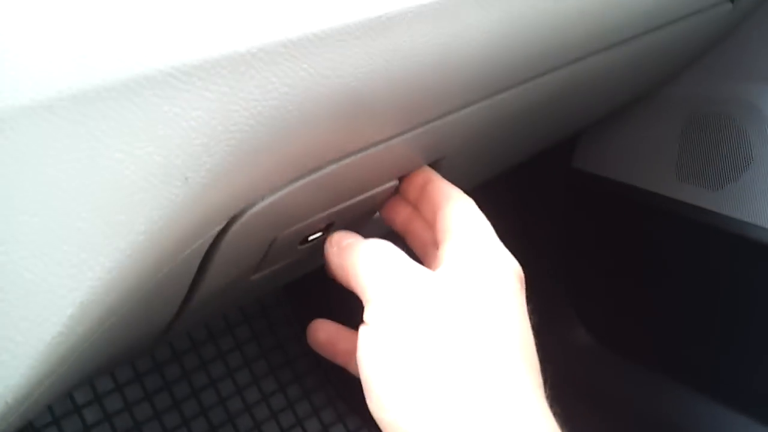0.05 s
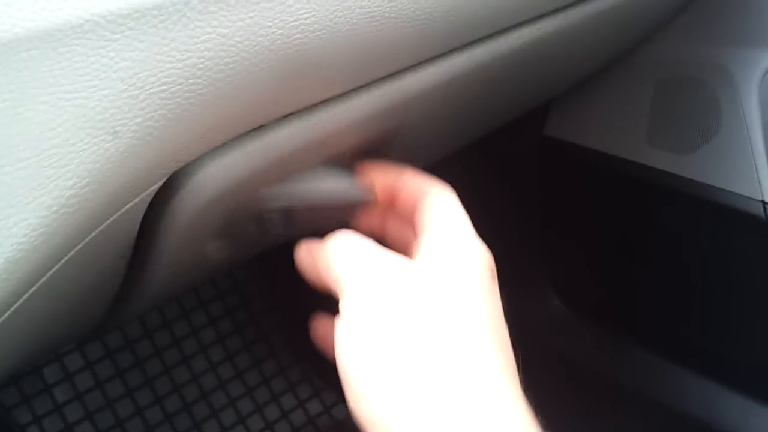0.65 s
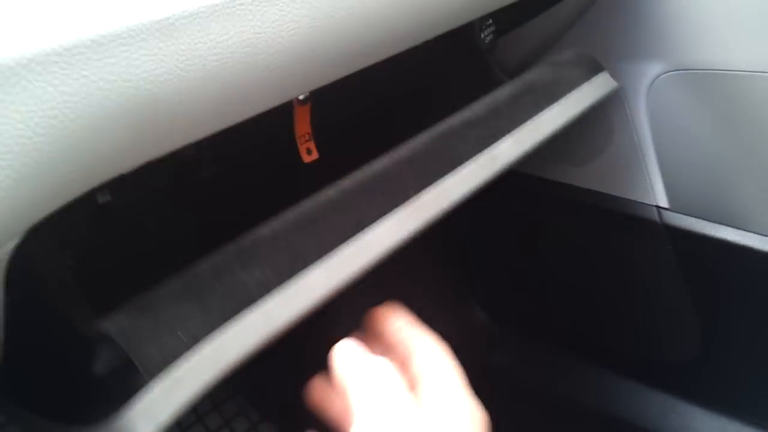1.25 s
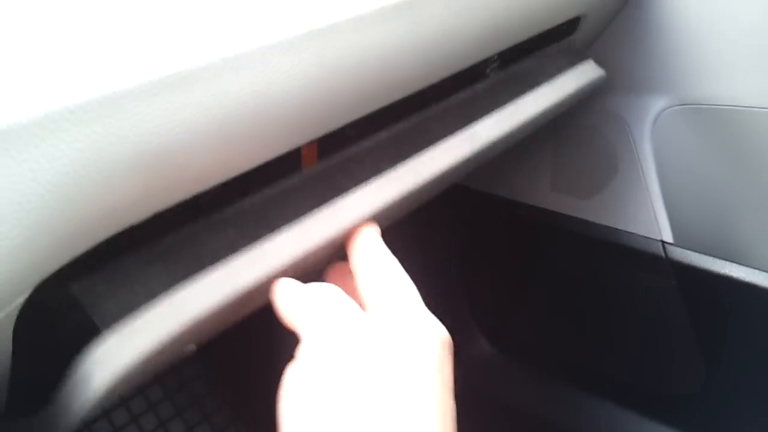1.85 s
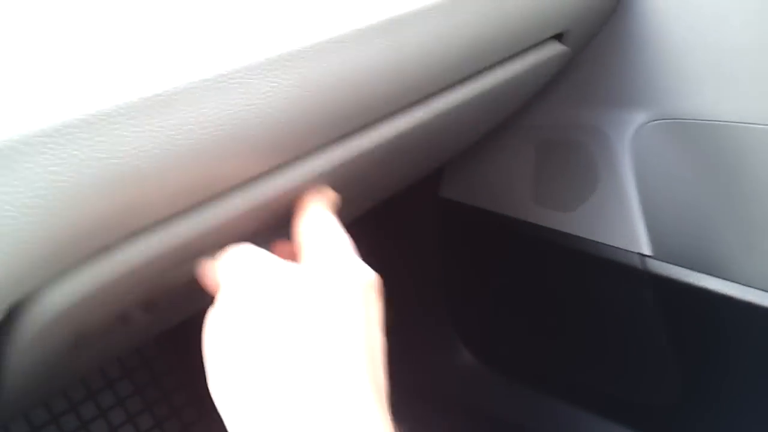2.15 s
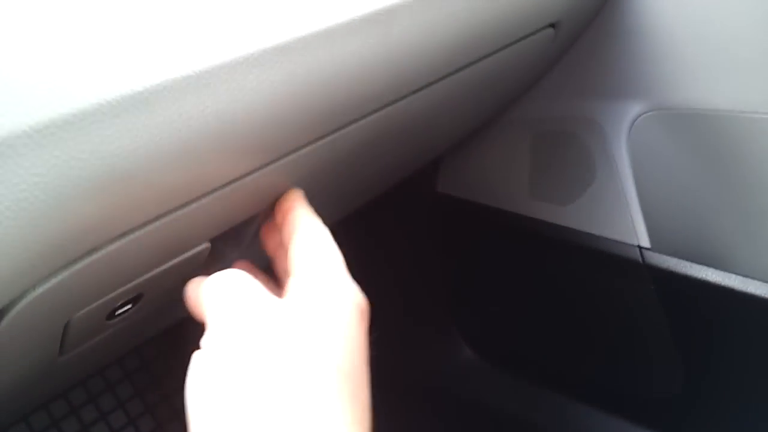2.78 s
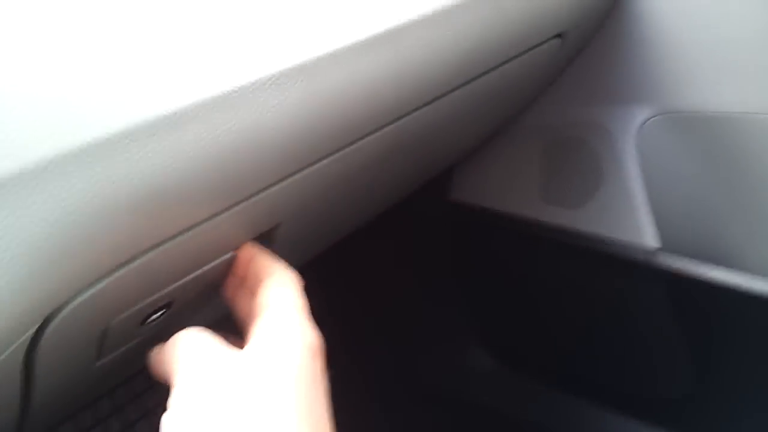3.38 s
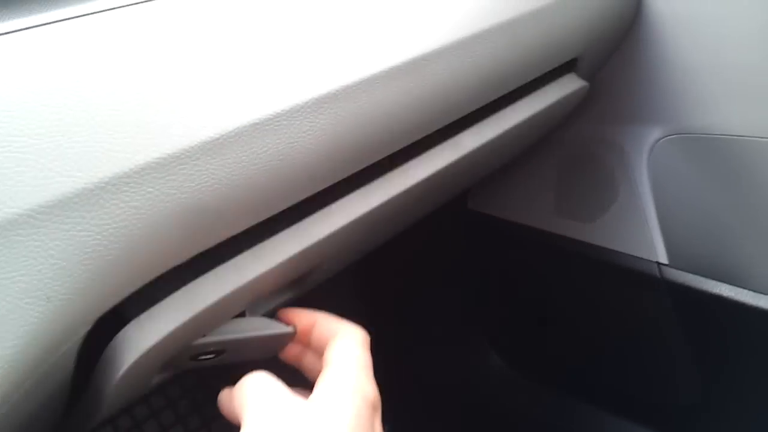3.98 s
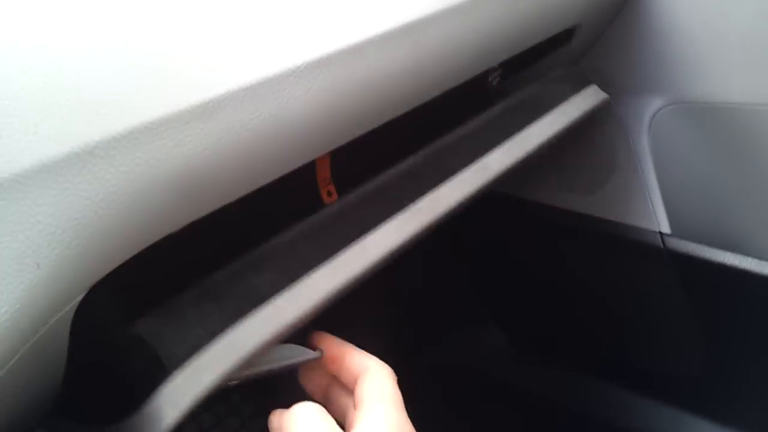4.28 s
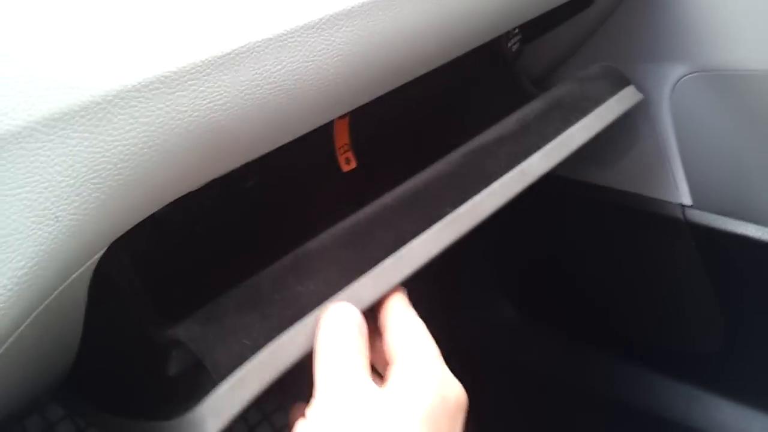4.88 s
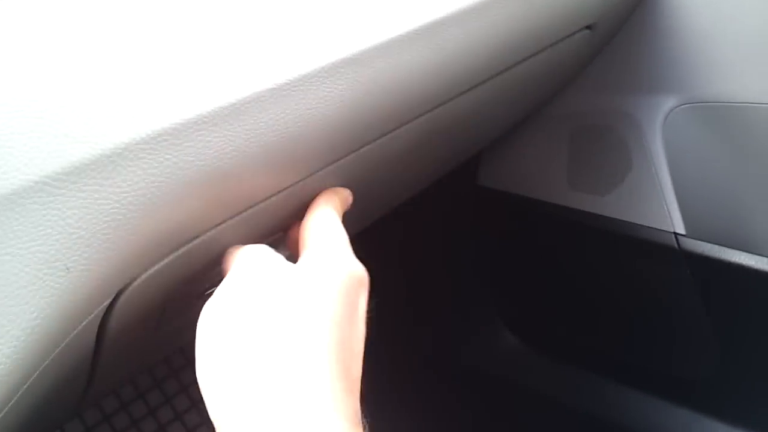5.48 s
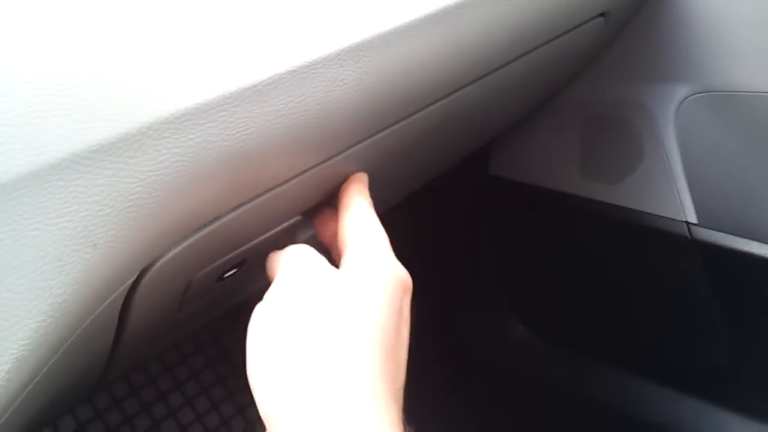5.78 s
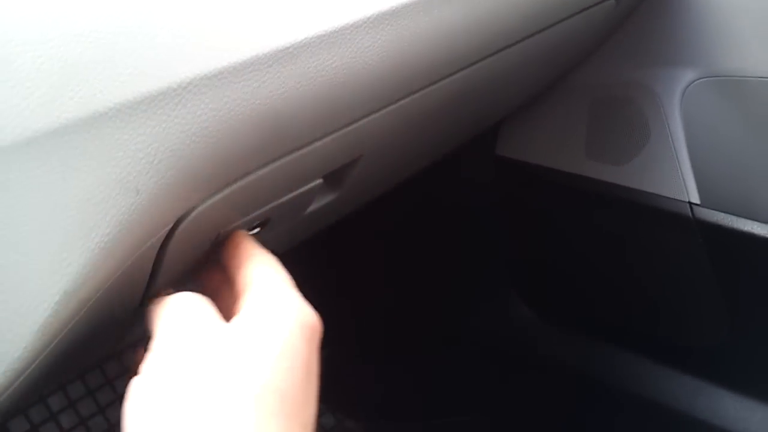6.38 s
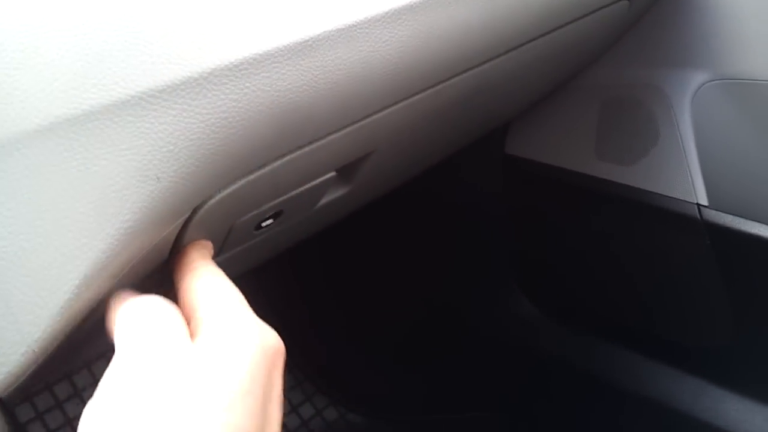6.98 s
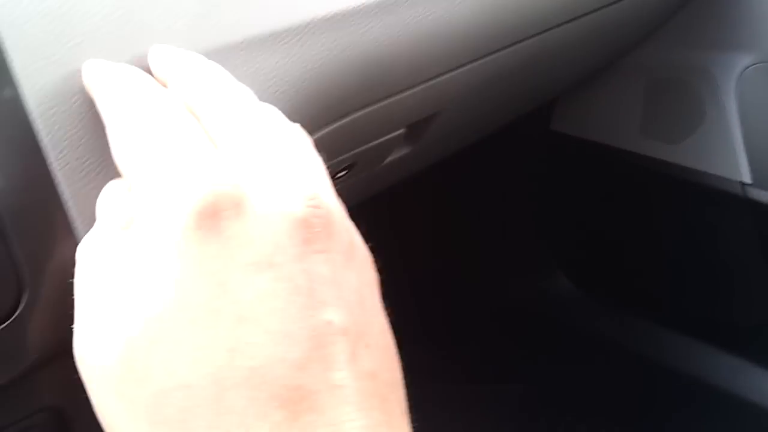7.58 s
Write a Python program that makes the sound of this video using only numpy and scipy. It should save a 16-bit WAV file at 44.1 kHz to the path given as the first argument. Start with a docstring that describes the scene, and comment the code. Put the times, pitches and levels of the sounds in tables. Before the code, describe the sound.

A plastic glove box is unlatched, drops open with a sharp crack and is pushed shut, twice, in a quiet parked car.

```python
"""A faint squeak over low hum and hiss, then taps and latch clunks: a glove box in a quiet parked car.
Twice the hollow plastic lid is unlatched, drops with a crack against its stop and is pushed shut.
Each blow rings the part it lands on, hinge and catch tick, and at the end a hand brushes the dashboard.
Two microphones in the cabin, the left a little farther off; the hardest cracks overload the recorder."""
import sys
import numpy as np
from scipy import signal
from scipy.fft import rfft, irfft, next_fast_len
from scipy.io import wavfile

SR = 44100
rng = np.random.default_rng(int(sys.argv[2]) if len(sys.argv) > 2 else 0)


def put_to_file(sound):
    """Save the sound as 16-bit audio at rate SR, in the file named by the first command-line argument."""
    columns = np.atleast_2d(sound).T  # one column per channel
    safe = np.clip(columns, -1, 1)
    whole_steps = np.round(safe * 32767)
    wavfile.write(sys.argv[1], SR, whole_steps.astype(np.int16))


N = 337365

# the stop's crowded, well-damped modes: f/Hz, level/dB per Hz
STOP_BODY = [(30, -49), (130, -20), (190, -33), (290, -29), (370, -10.5), (800, -5.5), (1080, -5.5),
             (1500, 0.5), (2000, 3), (2550, 0), (3100, -6), (4300, -10.5), (5500, -5.5), (6300, -12),
             (7400, -1), (9500, -13.5), (12000, -30), (14500, -24.5)]
# its clear modes: f/Hz, level/dB, t60/s
STOP_MODES = [(374.3, -15, .2), (428.4, -15.5, 0.22), (649, -17, 0.3), (710, -13.5, 0.11), (870, -10, 0.18),
              (1174, -23, .09), (1580, -7, 0.14), (1780, -4, 0.14), (1855, 0, .07), (1970, -6.5, 0.06),
              (2192, 4, 0.042), (2220, 1, 0.041), (2575.4, -0.5, 0.068), (2725, -15, 0.06),
              (4800, -9, 0.05), (5850, -8, 0.0504), (7100, -8.5, 0.046), (7815, -14, 0.055)]
# the lid falls open: t/s, level/dB, bass/dB, treble/dB, stay knock/dB, second crack/dB, bounce delay/s
DROPS = [(0.9333, -7, -7, -1, -29.5, -20, .0624), (4.3452, -5.5, 4, 2.5, -23, -10, .083)]

def lid_drops(stop_modes_db=-5.5):
    """The stay knocks and ticks, then the lid cracks twice against its stop and bounces once."""
    out = np.zeros((2, N))
    stop = STOP_BODY, STOP_MODES, stop_modes_db
    for s, db, bass_db, treble_db, stay_db, second_db, bounce_s in DROPS:
        add(out, s - .0413, knock(stay_db, weight_db=-12, hardness_db=10.5, build_s=.0015, ring=1.13))
        add(out, s - .02, tick(-32, treble_db=-13, ring=1.7))
        add(out, s, blow(*stop, db, bass_db, treble_db, build_s=.001, ring=.989, size=16384))
        second = blow(*stop, second_db, bass_db=1, treble_db=-7.5, build_s=.0012, ring=.678, size=8192)
        add(out, s + .0147, second)
        bounce = knock(db - 28.5, weight_db=-4, hardness_db=-3, build_s=.0022, ring=.5, size=3072)
        add(out, s + bounce_s, bounce)
    return out

# the hollow lid's crowded modes: f/Hz, level/dB per Hz
LID_BODY = [(25, -35), (70, -23), (190, -16.5), (290, -9), (400, -3), (620, -2.5), (780, -3), (1500, -1),
            (2300, -4), (3000, -8), (4100, -8.5), (5600, -16), (7700, -11.5), (10000, -21.5),
            (12500, -31.5), (14500, -32)]
# its clear modes: f/Hz, level/dB, t60/s
LID_MODES = [(392.8, -4.5, 0.18), (421, -1.5, 0.15), (499.3, 0.5, 0.14), (606.1, -3.5, 0.098),
             (651, -7, 0.14), (919.6, 1, 0.12), (1050, -2.5, 0.096), (1326, -3, .07), (1509.4, 3, 0.098),
             (1850, -1, 0.052)]
LID = LID_BODY, LID_MODES, -6  # clear modes against the clack/dB
# the lid is pushed home: t/s, level/dB, bass/dB, treble/dB, ring factor, drag/dB, settling knock/dB
SHUTS = [(2.2, -16, -2, -1, 0.68, -24.5, -35), (5.425, -12.5, -8.5, -2, 1.105, -22.5, -42.5)]

def lid_shuts():
    """The lid drags over the latch, slams into its frame and settles back."""
    out = np.zeros((2, N))
    for s, db, bass_db, treble_db, ring, drag_db, settle_db in SHUTS:
        drag = knock(drag_db, weight_db=bass_db + 5, hardness_db=2, build_s=.0033, ring=1.68)
        add(out, s - .011, drag)
        add(out, s, blow(*LID, db, bass_db, treble_db, build_s=.0022, ring=ring, size=12288))
        settle = knock(settle_db, weight_db=8, hardness_db=-5, build_s=.0011, ring=1.7, size=6144)
        add(out, s + .1305, settle)
    return out

# latch clunks: t/s, level/dB, weight/dB, hardness/dB, load/dB re level, rattle/dB re level, ring factor
CLUNKS = [(.454, -25, 0.5, 7, -4.5, -12, 1.01), (.502, -21.5, 0, -7.5, -0.5, -13, 0.74),
          (.627, -19, -3.5, 6.5, 1.5, -13, 1.16), (.659, -16.5, 0.5, -4, -6, -4.5, 0.8),
          (1.959, -19, -1.5, 6, 2.5, -13, 1.2), (2.168, -23, 4, 10, -6, -7, 1.2),
          (3.702, -26, 6, 3.5, -13, -19, 0.8), (3.908, -16, -13.5, 0, -6.5, -8, 1.26),
          (3.9287, -14.5, 0.5, 6.5, -9, -7, 0.86), (5.331, -19.5, -6, 7, 2, -13, 1.325),
          (5.406, -21, -11, 1, 2.5, -10, 1.3)]

def latch(load_after_s=.007, rattle_gap_s=.0205, rattle_fall_db=11.5):
    """The bolts strike, the lid takes the load with a second knock, then rattles loosely."""
    out = np.zeros((2, N))
    for s, db, weight_db, hardness_db, load_db, rattle_db, ring in CLUNKS:
        add(out, s, knock(db, weight_db, hardness_db, build_s=.0032, ring=ring, size=12288))
        add(out, s + load_after_s, knock(db + load_db, weight_db, hardness_db, build_s=.0013, ring=ring))
        for k in range(2):
            dying_db = db + rattle_db - k * rattle_fall_db
            rattle = knock(dying_db, weight_db=1.5, hardness_db=.5, build_s=.00265, ring=.64, size=4096)
            add(out, s + (k + 1) * rattle_gap_s, rattle)
    return out

# small ticks: t/s, level/dB, treble/dB, ring factor
TICKS = [(.44, -45, -8.5, 1.0), (.69, -18.5, 13, .7), (2.001, -33.5, -14.5, 1.0), (2.024, -33.5, -16, 2.14),
         (2.235, -30, 0, 1.35), (3.962, -27, -5.5, 0.51), (4.175, -30, 3, .95), (4.192, -35.5, -1, 0.93),
         (4.2548, -30, 4.5, 0.83), (4.2754, -36, -5.5, 1.0), (5.385, -26.5, -12, 1.7),
         (5.663, -30.5, 0, 0.88)]

def hinge_and_catch():
    """Hinge and catch tick between the heavier blows."""
    out = np.zeros((2, N))
    for s, db, treble_db, ring in TICKS:
        add(out, s, tick(db, treble_db, ring))
    return out

# the catch's crowded modes: f/Hz, level/dB per Hz
CATCH_BODY = [(60, -22), (180, -7.5), (320, -2.5), (650, 0.5), (1100, -0.5), (1500, -3), (2600, 0),
              (4000, -3.5), (5500, -1.5), (7700, -1.5), (10000, -3), (13000, -15), (14500, -16)]
# its clear modes: f/Hz, level/dB, t60/s
CATCH_MODES = [(658.6, -15, 0.29), (1440, -5.5, 0.09), (1830, -5, 0.12), (3082, -1, 0.077),
               (3847, -3.5, 0.065), (7490, 6.5, 0.024)]

def tick(db, treble_db, ring, modes_db=-5):
    """One click of the small, stiff parts of hinge and catch."""
    catch = CATCH_BODY, CATCH_MODES, modes_db
    return blow(*catch, db, bass_db=-1.5, treble_db=treble_db, build_s=.0004, ring=ring, size=4096)

# taps on the lid: t/s, level/dB, weight/dB, hardness/dB, build-up/s at hardness 0
TAPS = [(.274, -49, -23, -4, .003), (.556, -35.5, 5, -7, .0014), (.811, -42, -4.5, -8.5, 0.0023),
        (1.592, -33, 2.5, -19, 0.00105), (2.1339, -23, 5.5, 11, 0.00165), (2.515, -38, 7, -0.5, 0.00324),
        (3.765, -30.5, 0.5, -9, 0.001), (3.796, -29, 4.5, -16, 0.001), (3.820, -34.5, -1, -9, .0016),
        (4.124, -38, -13, -19, 0.00067), (4.784, -42.5, -3, -24, .0005), (4.863, -42, 8, -23, 0.00065)]
# creaks: t/s, length/s, level/dB
CREAKS = [(0.589, .036, -39), (1.566, .012, -42.5), (2.112, .01, -40), (3.843, .06, -42.5),
          (4.813, .025, -49.5)]

def fingers(slip_gap_s=.014):
    """Fingers and handle knock on the lid, which creaks under them in small uneven slips."""
    out = np.zeros((2, N))
    for s, db, weight_db, hardness_db, build_s in TAPS:
        add(out, s, knock(db, weight_db, hardness_db, build_s, ring=.954, size=6144))
    for start, length, db in CREAKS:
        for s in np.arange(start, start + length, slip_gap_s):
            slip = knock(db, weight_db=9.5, hardness_db=-.5, build_s=.0024, ring=2.6, size=3072)
            add(out, s + slip_gap_s * rng.uniform(0, .45), slip)
    return out

def knock(db, weight_db, hardness_db, build_s, ring, size=8192):
    """A harder knock on the lid is quicker, brighter and drives its hollow more; weight adds bass."""
    bass_db = 2.5 + .42 * hardness_db + weight_db
    build_s *= 2 ** (-hardness_db / 15)  # 15 dB harder builds up twice as fast
    return blow(*LID, db, bass_db, hardness_db, build_s, ring, size)

def blow(body, modes, modes_db, db, bass_db, treble_db, build_s, ring, size):
    """Struck plastic clacks and rings; db is the level of the first 12 ms, ring scales its decay times."""
    t = np.arange(size) / SR
    sound = clack(body, t, bass_db, treble_db, ring)
    sound += amp(modes_db) * ringing(modes, t, bass_db, treble_db, ring)
    sound *= 1 - np.exp(-t / max(build_s, 1e-4))  # the part is loaded gradually
    sound *= np.minimum(2 * (1 - t / t[-1]), 1) ** 2  # fade over the second half
    return amp(db) * sound / np.sqrt(np.mean(sound[:, :SR // 80] ** 2))

# decay of the plastic at ring factor 1: f/Hz, t60/s
PLASTIC_DECAY = [(100, 0.45), (400, 0.15), (750, .14), (1500, 0.081), (3000, 0.073), (7000, 0.066),
                 (14000, 0.077)]
# the cabin's late sound: f/Hz, level/dB
CABIN_TAIL = [(100, -16), (400, -22), (750, -22), (1500, -38.5), (3000, -36), (7000, -40.5), (14000, -48.5)]
# the glove box at the microphones: f/Hz, left-right likeness (noise is fully alike from 1 up)
BOX_LIKENESS = [(60, 1.07), (130, 0.14), (330, 2.13), (550, 1.06), (1100, .5), (1900, 0.055),
                (14000, 0.0165)]
# its place between them: f/Hz, left minus right/dB
BOX_BALANCE = [(60, 5), (120, 8.5), (250, 0), (1000, -2.5), (2000, -2), (4000, -4), (8000, -8), (14000, -5)]

def clack(body, t, bass_db, treble_db, ring, cabin_t60=.565, chatter_hz=450):
    """Crowded modes die band by band; the loose plastic chatters, and the cabin rings on faintly."""
    hz, noise = noise_pair(len(t), BOX_LIKENESS)
    centres, t60s = np.transpose(PLASTIC_DECAY)
    snap_db = 3 * np.exp(-t / .002)
    chatter_db = drift(len(t), chatter_hz) + snap_db
    sound = np.zeros((2, len(t)))
    for centre, t60, one_band in zip(centres, t60s, np.eye(len(centres))):
        band = np.interp(np.log(hz + 1), np.log(centres), one_band)
        early = amp(chatter_db * centre / (centre + 1200)) * decay(t, t60 * ring)
        late = amp(at_hz(CABIN_TAIL, centre)) * decay(t, cabin_t60)
        sound += irfft(noise * band) * np.hypot(early, late)
    spectrum = rfft(sound)
    # the part sets the broad colour; the fine ripple varies from blow to blow
    broad_power = smoothed(np.mean(abs(spectrum) ** 2, axis=0), hz)
    colour = amp(at_hz(body, hz)) * contact(hz, bass_db, treble_db) / np.sqrt(broad_power)
    return unit_rms(irfft(spectrum * causal(colour) * sides(BOX_BALANCE, hz)))

def ringing(modes, t, bass_db, treble_db, ring, scatter_db=2, detune=.0039):
    """The clear modes, each struck at a chance point of its shape."""
    hz, db, t60 = np.transpose(modes)
    phase, mistune, apart, strength = rng.standard_normal((len(hz), 4)).T
    envelopes = decay(t, t60[:, None] * ring)
    gains = sides(BOX_BALANCE, hz) * amp(db + scatter_db * strength) * contact(hz, bass_db, treble_db)
    angle = 2 * np.pi * (np.outer(hz * (1 + detune * mistune), t) + phase[:, None])
    right_lead = 2 * np.pi * hz * LEFT_LAG_S + 2 * apart * (1 - at_hz(BOX_LIKENESS, hz))
    left = gains[0] @ (envelopes * np.sin(angle))
    right = gains[1] @ (envelopes * np.sin(angle + right_lead[:, None]))
    return unit_rms(np.array([left, right]))

def contact(hz, bass_db, treble_db, bass_hz=600, treble_hz=3500):
    """A heavy contact adds bass, a hard one treble."""
    return amp(bass_db / (1 + (hz / bass_hz) ** 2) + treble_db / (1 + (treble_hz / (hz + 1)) ** 2))

# air pushed by the lid: t/s, level/dB, length/s
PUFFS = [(.645, -47, 0.057), (2.185, -67, 0.046), (3.924, -35, 0.013), (4.04, -66, 0.04),
         (5.42, -44.5, 0.041)]

def puffs(low_hz=55, high_hz=150):
    """The lid shoves the air in the box: a soft, low thud."""
    out, t = np.zeros((2, N)), np.arange(SR // 2) / SR
    band = signal.butter(3, [low_hz, high_hz], "band", fs=SR, output="sos")
    for s, db, length in PUFFS:
        age = 2 * t / length
        thud = signal.sosfilt(band, rng.standard_normal(len(t))) * age * np.exp(-age)
        thud /= np.sqrt(np.sum(thud ** 2) / (length * SR))
        add(out, s, amp(db) * thud * sides(BOX_BALANCE, low_hz))
    return out

# faint squeaks and thin whines: t/s, length/s, f/Hz, rms wobble/Hz, level/dB
SQUEAKS = [(.01, 0.084, 1889, 17.3, -46), (0.084, 0.076, 1920, 18, -48.5), (3.094, .135, 9803, 3, -47.5),
           (3.202, 0.072, 9803, 3, -60), (4.623, 0.069, 498, 52, -44)]

def squeaks():
    """Near-pure tones that swell, waver and fade."""
    out = np.zeros((2, N))
    for s, length, hz, wobble_hz, db in SQUEAKS:
        size = int(length * SR)
        turns = np.cumsum(hz + wobble_hz * drift(size, 95)) / SR
        lag_turns = np.array([[hz * LEFT_LAG_S / 2], [0]])
        tone = unit_rms(np.sin(2 * np.pi * (turns - lag_turns)))
        add(out, s, amp(db) * tone * signal.windows.tukey(size, .8) * sides(AIR_BALANCE, hz))
    return out

# skin on grained plastic: f/Hz, level/dB per Hz
SKIN_COLOUR = [(200, -25), (1500, -9.5), (2700, -5.5), (4000, -4), (6000, -7.5), (7600, -0.5),
               (10000, -9.5), (14500, -11)]
# strokes of the hand: t/s, length/s, level/dB, fade in/s, fade out/s
BRUSHES = [(2.76, 0.232, -56, .07, 0.148), (6.2, 0.44, -55, 0.18, 0.23), (7.035, 0.263, -49.5, 0.0334, .04),
           (7.305, 0.445, -48.5, 0.02, 0.302)]

def hand():
    """Skin catches on the grain of the dashboard."""
    grain_db = 1.1 * drift(N, 500) + .9 * drift(N, 22)
    return cabin_noise(SKIN_COLOUR) * swells(BRUSHES) * amp(grain_db)

# the parked car's room tone: f/Hz, level/dB per Hz
HISS_COLOUR = [(20, -26), (45, -3.5), (85, -11.5), (112, -14), (165, -3), (240, -7), (300, -2.5), (800, -4),
               (1200, -3.5), (1950, -6), (2600, -12), (3800, -14.5), (6000, -20.5), (7700, -20),
               (14500, -22)]
# its slow rise and fall: t/s, level/dB before the lift
HISS_LEVEL = [(0.0, -55), (0.79, -51), (1.38, -53), (2.07, -51.5), (3.32, -53), (3.81, -51), (5.96, -55.5),
              (7.65, -54)]
# a soft rush behind the hiss: f/Hz, level/dB per Hz
RUSH_COLOUR = [(100, -35), (700, -22), (1080, 3.5), (1400, -3), (2050, 3.5), (2700, -5.5), (5000, -29),
               (14000, -38)]
# its swells: t/s, length/s, level/dB, fade in/s, fade out/s
RUSHES = [(-.2, 2.06, -53.5, 0.44, 1.16), (3.5, 0.95, -48, 0.82, .35), (5.0, 3.39, -53, 1.43, 1.31),
          (6.865, 0.085, -50, 0.044, 0.066)]
# the low hum: t/s, level/dB
HUM_LEVEL = [(0, -72), (.5, -60), (3.2, -63), (3.8, -74), (4.6, -60.5), (5.6, -59.5), (6.8, -62.5),
             (7.2, -67), (7.65, -75)]

def room_tone(hiss_lift_db=5, hum_hz=56.5, waver_hz=.97, throb_db=2):
    """Soft hiss, a faint rush and a wavering hum that is stronger at the left microphone."""
    unrest_db = .4 * drift(N, 15)
    hiss = cabin_noise(HISS_COLOUR) * amp(hiss_lift_db + over_time(HISS_LEVEL) + unrest_db)
    rush = cabin_noise(RUSH_COLOUR) * swells(RUSHES)
    turns = np.cumsum(hum_hz + waver_hz * drift(N, 6.5)) / SR
    hum = unit_rms(np.sin(2 * np.pi * turns) * amp(throb_db * drift(N, 7.1)))
    return hiss + rush + hum * amp(over_time(HUM_LEVEL)) * sides(AIR_BALANCE, hum_hz)

# the cabin's standing waves: f/Hz, width/Hz, gain/dB
CABIN_MODES = [(300, 53, 2.5), (494, 41, 3.5), (662, 36, 6.5), (1000, 68, 3), (1440, 44, -2)]
# the ambience at the microphones: f/Hz, left-right likeness
AIR_LIKENESS = [(60, 0.78), (130, 0.78), (290, 0.77), (640, 0.59), (1390, 0.63), (3000, 0)]
# its place between them: f/Hz, left minus right/dB
AIR_BALANCE = [(60, 5), (110, 11), (200, -2), (700, -0.47), (2400, -4), (8000, -3.5), (14800, 0)]

def cabin_noise(colour):
    """Steady noise of a given colour, through the cabin's resonances to both microphones."""
    hz, noise = noise_pair(next_fast_len(N, real=True), AIR_LIKENESS)
    modes_db = sum(db / (1 + (2 * (hz - f) / width) ** 2) for f, width, db in CABIN_MODES)
    spectrum = noise * amp(at_hz(colour, hz) + modes_db) * sides(AIR_BALANCE, hz)
    return unit_rms(irfft(spectrum)[:, :N])

LEFT_LAG_S = .0001685  # about 6 cm more path to the left microphone

def noise_pair(size, likeness):
    """Frequencies and partly alike white spectra at the two microphones."""
    hz = np.fft.rfftfreq(size, 1 / SR)
    shared, own = rfft(rng.standard_normal((2, size)))
    alike = np.clip(at_hz(likeness, hz), -1, 1)
    left = shared * np.exp(-2j * np.pi * hz * LEFT_LAG_S)
    right = alike * shared + np.sqrt(1 - alike ** 2) * own
    return hz, np.array([left, right])

def sides(balance, hz):
    """Gains at the left and right microphone."""
    return amp(np.outer([.5, -.5], at_hz(balance, hz)))

def swells(rows):
    """An envelope in which each row fades smoothly in and out."""
    t, envelope = np.arange(N) / SR, np.zeros(N)
    for s, length, db, rise, fall in rows:
        ramp = np.clip(np.minimum((t - s) / rise, (s + length - t) / fall), 0, 1)
        envelope += amp(db) * ramp ** 2 * (3 - 2 * ramp)
    return envelope

def causal(gain):
    """The minimum-phase filter of this shape: it rings only after a blow."""
    cepstrum = irfft(np.log(np.maximum(gain / gain.max(), 1e-5)))
    cepstrum[1:] *= 1 + np.sign(len(cepstrum) / 2 - np.arange(1, len(cepstrum)))
    return np.exp(rfft(cepstrum))

def smoothed(power, hz):
    """Mean power over a width that grows with frequency."""
    total, half_hz = np.cumsum(power), .22 * hz + 60
    lo, hi = np.maximum(hz - half_hz, 0), np.minimum(hz + half_hz, hz[-1])
    return (np.interp(hi, hz, total) - np.interp(lo, hz, total)) / (hi - lo) + 1e-12

def drift(size, hz):
    """Random wander with rms 1, mostly slower than hz."""
    f = np.fft.rfftfreq(size, 1 / SR)
    return unit_rms(irfft(rfft(rng.standard_normal(size)) / (1 + (f / hz) ** 2) ** 2, size))

def at_hz(points, hz):
    """Points joined by straight lines on a log-frequency axis."""
    f, value = np.transpose(points)
    return np.interp(np.log(hz + 1), np.log(f + 1), value)

def over_time(points):
    return np.interp(np.arange(N) / SR, *np.transpose(points))

def decay(t, t60):
    return np.exp(-np.log(1000) * t / t60)

def amp(db):
    return 10 ** (np.asarray(db) / 20)

def unit_rms(x):
    return x / np.sqrt(np.mean(x ** 2) + 1e-20)

def add(mix, s, sound):
    part = mix[:, max(round(s * SR), 0):][:, :sound.shape[1]]
    part += sound[:, :part.shape[1]]

def scene():
    """The quiet sounds of the cabin, with the glove box in front."""
    quiet = room_tone() + hand() + squeaks() + puffs()
    return quiet + lid_drops() + lid_shuts() + latch() + hinge_and_catch() + fingers()

def record(dry, edge_hz=14720):
    """The recorder clips on the hardest cracks, then cuts the top treble."""
    low_pass = signal.firwin(301, edge_hz, window=("kaiser", 8), fs=SR)
    return signal.oaconvolve(np.clip(dry, -1, 1), low_pass[None], "same")

dry = scene()
out = record(dry)
put_to_file(out)
```